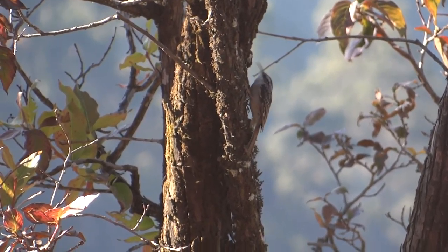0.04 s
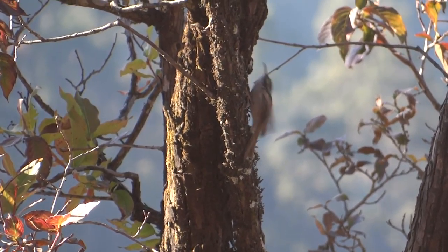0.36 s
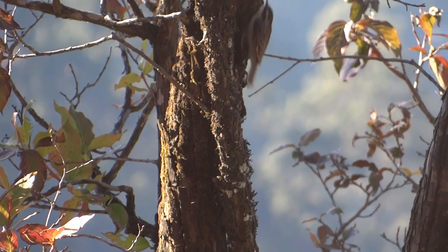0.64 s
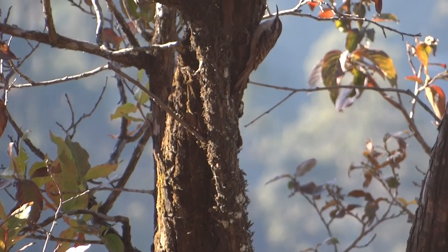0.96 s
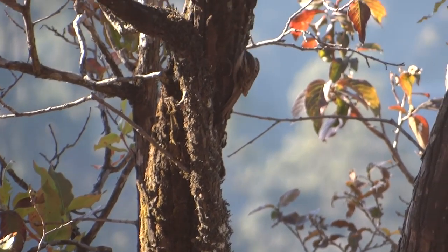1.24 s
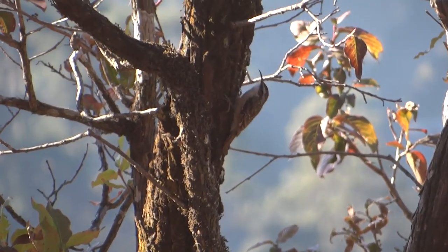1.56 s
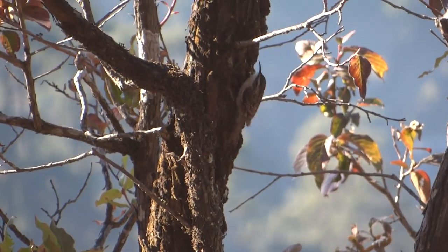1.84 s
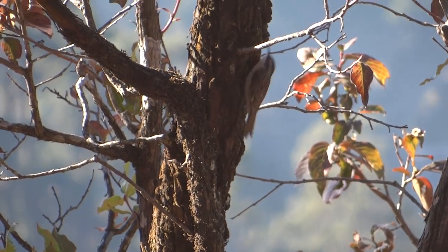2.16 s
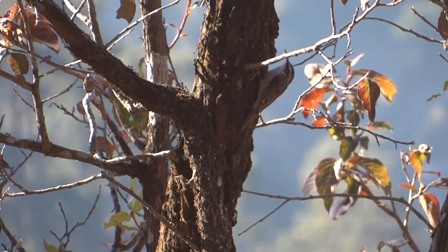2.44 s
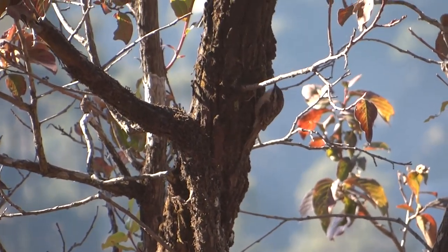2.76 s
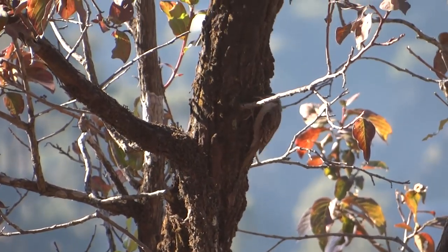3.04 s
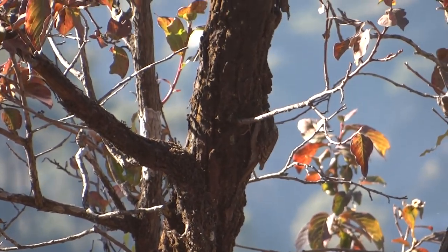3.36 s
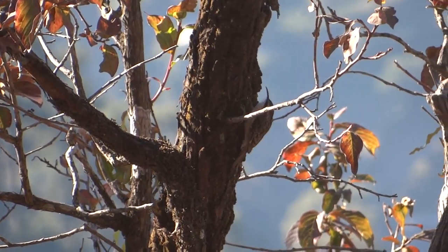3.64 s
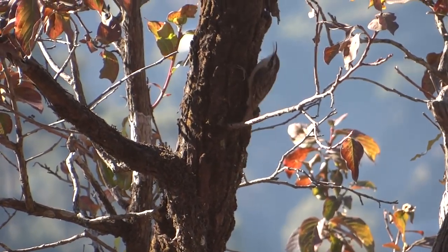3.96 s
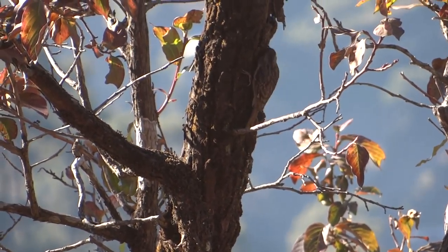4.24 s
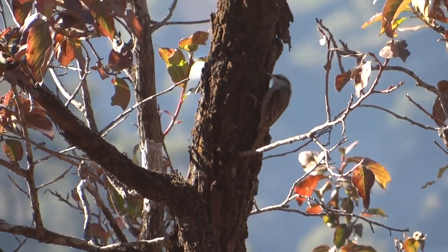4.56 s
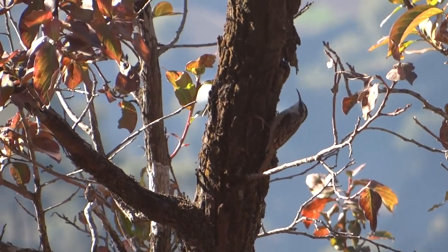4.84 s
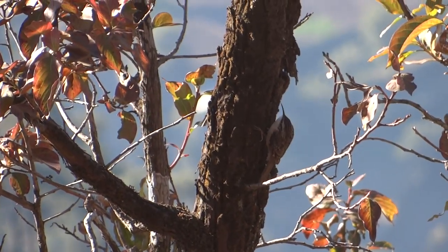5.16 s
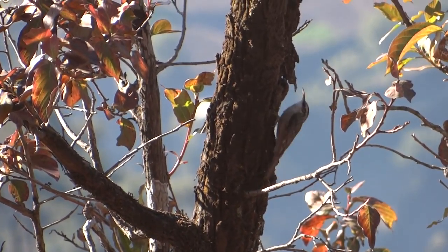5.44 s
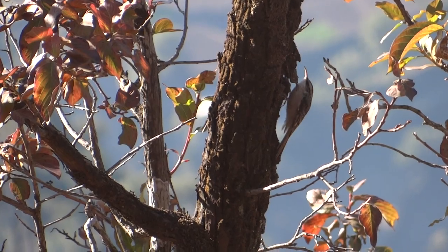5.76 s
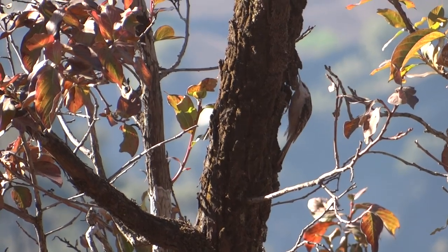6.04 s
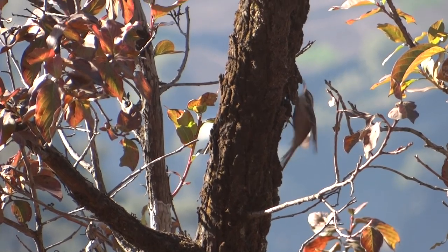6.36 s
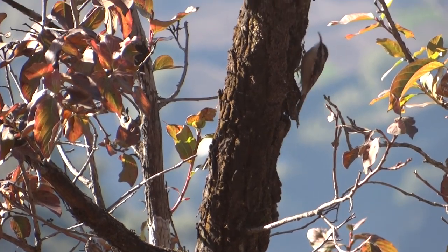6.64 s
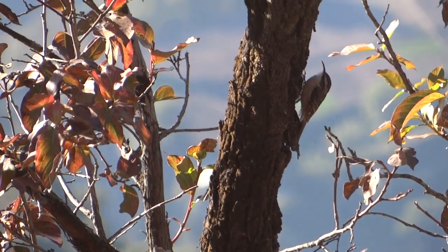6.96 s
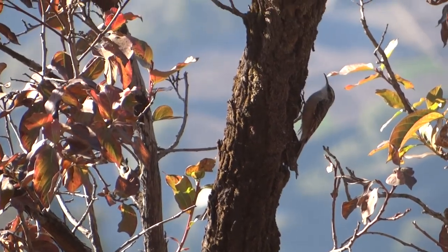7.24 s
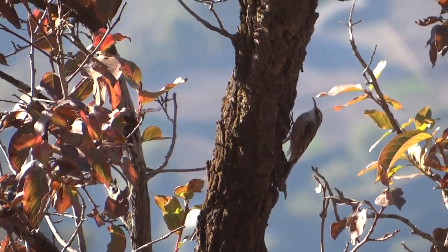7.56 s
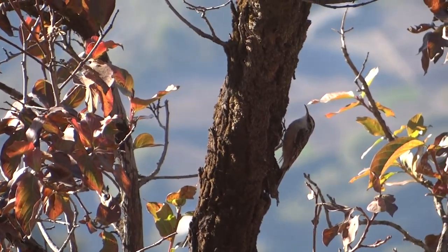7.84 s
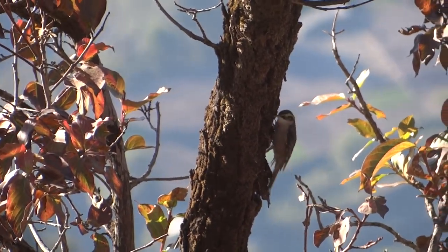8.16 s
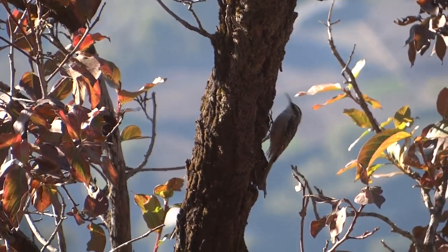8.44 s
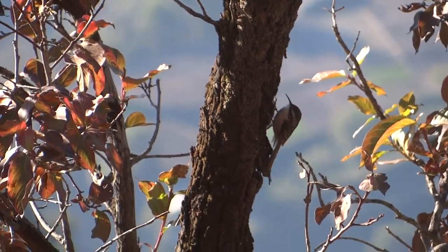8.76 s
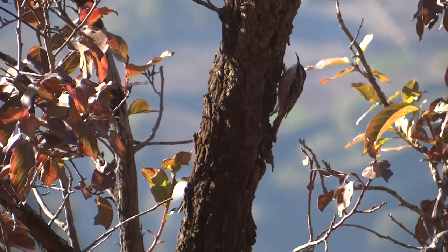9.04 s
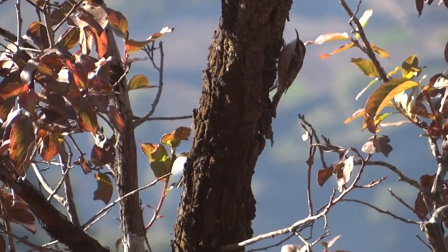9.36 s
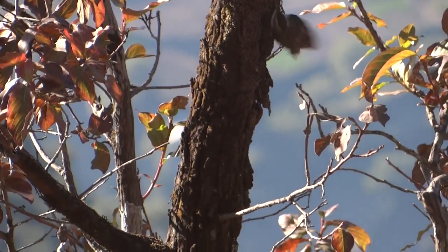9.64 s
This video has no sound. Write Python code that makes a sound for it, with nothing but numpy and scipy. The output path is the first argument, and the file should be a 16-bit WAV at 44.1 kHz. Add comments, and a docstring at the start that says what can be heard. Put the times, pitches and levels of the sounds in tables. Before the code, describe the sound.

On a quiet wooded hillside, wind hits the microphone in low, fluttering puffs that swell and collapse. Now and then the bark ticks faintly under a small climbing bird, and a single damped knock comes just past the middle. Soon afterwards the gusts fade, and what remains is the steady hush of the valley, faint distant drones, microphone hiss and a slight crackle of dry leaves.

```python
"""Gusts buffet the microphone with a low rumble and die away after seven seconds.
Behind them: the wide hush of a wooded valley, faint far drones and the microphone's own hiss.
Bark ticks faintly as a small bird climbs a trunk, and dry leaves rustle.
One dry, heavily damped knock sounds at six seconds."""
import sys
import numpy as np
from scipy import signal
from scipy.fft import rfft, irfft, next_fast_len
from scipy.io import wavfile
from scipy.ndimage import uniform_filter1d

SR = 44100
rng = np.random.default_rng(int(sys.argv[2]) if len(sys.argv) > 2 else 0)


def materialize(psi):
    """Save the field psi as 16-bit PCM at rate SR to the path in sys.argv[1].

    A 1-D psi becomes a single channel; in a 2-D psi each row is a channel.
    """
    bounded = np.clip(np.atleast_2d(psi).T, -1, 1)
    quanta = np.round(bounded * 32767).astype(np.int16)
    wavfile.write(sys.argv[1], SR, quanta)


N = 436590


def gain_of(db):
    """Decibels to amplitude."""
    return 10 ** (np.asarray(db) / 20)


def unit_rms(x):
    """Scales to rms 1."""
    return x / np.sqrt(np.mean(x ** 2) + 1e-20)


def coloured(x, spectrum):
    """Filters x by rows of (Hz, dB), interpolated over log frequency."""
    size = next_fast_len(x.shape[-1])
    hz, db = np.transpose(spectrum)
    bin_db = np.interp(np.log(np.fft.rfftfreq(size, 1 / SR) + 1), np.log(hz + 1), db)
    return irfft(rfft(x, size) * gain_of(bin_db), size)[..., :x.shape[-1]]


def stereo_noise(side_spectrum):
    """Left and right from a white mid and a filtered side."""
    mid, side = rng.standard_normal((2, N))
    side = coloured(side, side_spectrum)
    return np.array([mid + side, mid - side])


def add(mix, start_s, sound):
    """Mixes a sound in from start_s."""
    part = mix[..., max(round(start_s * SR), 0):][..., :sound.shape[-1]]
    part += sound[..., :part.shape[-1]]


def airflow(attack_s=0.022, release_s=0.029, flutter_db=2, flutter_per_s=30):
    """Level and fineness of the flow in dB: gusts swell, hold and collapse over light air."""
    # Each row: time in seconds, level between gusts in dB.
    light_air = [(0, -58), (.3, -47), (.9, -52), (1.4, -51), (2.13, -54), (2.8, -48), (3.6, -43.5),
                 (3.9, -62.5), (4.4, -52.5), (5.4, -52.5), (5.65, -52), (7.05, -58), (7.6, -53.5),
                 (8.1, -66.5), (8.8, -67.5), (9.15, -61.5), (9.9, -59)]
    # Each row: start in seconds, length in seconds, level in dB, fineness in dB (higher is brighter).
    gusts = [(0.057, 0.042, -47, -10), (0.203, 0.11, -40, 3), (0.373, .12, -40, 10.5),
             (0.558, 0.065, -39.5, 6), (0.664, .21, -39, 16), (0.919, .06, -41, 10),
             (1.01, 0.091, -39.5, -3), (1.159, 0.079, -40, 6), (1.266, 0.12, -44.5, 15),
             (1.5, 0.18, -45, 5.5), (1.721, 0.15, -44.5, 13), (1.928, 0.064, -43.5, 4),
             (2.224, 0.11, -51, -4), (2.5, 0.15, -42, 7), (2.63, 0.12, -33.5, 6), (2.751, .22, -36.5, 5.5),
             (2.996, 0.056, -43.5, 4), (3.16, 0.18, -48, -1), (3.377, .13, -35, 5),
             (3.558, 0.13, -39.5, -1), (4.07, 0.17, -46.5, -2), (4.249, 0.184, -43, 5.5),
             (4.546, 0.14, -43, 4), (4.66, .21, -39.5, 4.5), (4.88, .18, -41.5, 0), (5.078, 0.11, -42.5, 7),
             (5.226, 0.086, -50, 0), (5.38, 0.066, -46.5, 13), (5.949, .1, -46, -8), (6.45, 0.065, -47, 3),
             (6.526, 0.18, -43, -3), (7.16, 0.041, -51, -3), (7.347, 0.083, -47, -2),
             (9.463, .06, -55.5, -4)]
    t = np.arange(N) / SR
    power = gain_of(np.interp(t, *np.transpose(light_air))) ** 2
    weighted_fineness = np.zeros(N)
    for start_s, length_s, db, fine_db in gusts:
        ramp = np.minimum((t - start_s) / attack_s, (start_s + length_s - t) / release_s)
        gust_power = (gain_of(db) * np.clip(0.5 + ramp, 0, 1)) ** 2
        power += gust_power
        weighted_fineness += fine_db * gust_power
    flutter = np.interp(t * flutter_per_s, np.arange(1024), rng.standard_normal(1024))
    return 10 * np.log10(power) + flutter_db * flutter, weighted_fineness / power


def wind(trim_db=-2.25, breeze_db=-40.5, strong_db=-26.5, steady_s=0.058, lull=0.12):
    """Turbulence at the microphone: a stronger gust sheds smaller eddies and sounds brighter."""
    # Each row: frequency in Hz, relative density in dB.
    breeze_spectrum = [(12, -18), (32, -4.5), (55, 3), (90, -4), (125, -11), (180, -22), (250, -31.5),
                       (400, -45), (1000, -64.5), (3000, -100)]
    gust_spectrum = [(12, -32), (32, -12), (55, 3), (100, -1), (140, -3), (200, -16), (270, -26.5),
                     (450, -41.5), (1000, -56), (3000, -97)]
    # Each row: frequency in Hz, side over mid in dB.
    side_spectrum = [(30, -20), (60, -13.5), (110, -8.5), (170, -2.5), (260, -2), (500, 4)]
    flow_db, fine_db = airflow()
    force = np.clip((flow_db + fine_db - breeze_db) / (strong_db - breeze_db), 0, 1)
    air = stereo_noise(side_spectrum)
    rumble = (1 - force) * unit_rms(coloured(air, breeze_spectrum))
    rumble += force * unit_rms(coloured(air, gust_spectrum))
    # Level the noise so that the flow sets the slow swell.
    span = int(steady_s * SR)
    power = uniform_filter1d(uniform_filter1d(rumble.mean(0) ** 2, span), span)
    # Below the mean flow, turbulence collapses into separate puffs.
    slack_db = np.minimum(flow_db - uniform_filter1d(flow_db, SR // 4), 0)
    return gain_of(flow_db + lull * slack_db + trim_db) * rumble / np.sqrt(power + 1e-9)


def valley(level_db=-66.5):
    """Far air in the trees, steady and from all sides."""
    # Each row: frequency in Hz, relative density in dB.
    spectrum = [(30, -15), (90, 3), (170, 2.5), (300, 0.5), (440, -1), (620, -2.5), (800, -4.5),
                (1020, -6.5), (1400, -8.5), (2400, -13.5), (5000, -20.5), (9000, -27.5), (15000, -47)]
    # Each row: frequency in Hz, side over mid in dB.
    side_spectrum = [(60, -9.5), (200, -3.5), (400, 0), (700, 1.5), (1100, 2), (2000, 1), (4000, -1.5)]
    hush = coloured(stereo_noise(side_spectrum), spectrum)
    return gain_of(level_db) * hush / np.std(hush.mean(0))


def drones(growth_db=3):
    """Narrow bands of far-off noise that waver and slowly grow."""
    # Each row: centre in Hz, width in Hz, mid-scene rms in dB.
    bands = [(443, 93, -78), (763, 70, -81), (1166, 94, -82), (1697, 56, -88)]
    hz = np.fft.rfftfreq(N, 1 / SR)
    shape = sum(gain_of(db) * unit_rms(1 / (1 + (2 * (hz - centre_hz) / width_hz) ** 4))
                for centre_hz, width_hz, db in bands)
    noise = irfft(rfft(rng.standard_normal((2, N))) * shape, N)
    return noise * gain_of(growth_db * np.linspace(-0.5, 0.5, N))


def hiss(rms_db=-73):
    """Steady microphone self-noise, alike in both channels."""
    # Each row: frequency in Hz, relative density in dB.
    spectrum = [(100, 2), (1000, -7.5), (2600, -2), (5000, -1), (9500, -2), (13000, -4.5), (15500, -7.5)]
    return gain_of(rms_db) * unit_rms(coloured(rng.standard_normal(N), spectrum))


def rustle(crackles_per_s=150, spread_db=3, decay_s=0.0016):
    """Dry leaves and bark crackle in tiny noise bursts of uneven size."""
    # Each row: time in seconds, rms in dB.
    levels = [(0, -97), (5.8, -89), (7.4, -83), (7.8, -80), (9, -85.5), (9.5, -81), (9.9, -81)]
    # Each row: frequency in Hz, relative density in dB.
    spectrum = [(800, -20), (2500, 3), (5000, -2), (8500, -3), (11000, -9), (15000, -17)]
    sizes = gain_of(spread_db * np.minimum(rng.exponential(1, N), 3.5))
    onsets = rng.random(N) < crackles_per_s / SR
    decay = np.exp(-np.arange(SR // 50) / (decay_s * SR))
    bursts = signal.oaconvolve(sizes * onsets, decay)[:N]
    crackle = unit_rms(coloured(bursts * rng.standard_normal(N), spectrum))
    return crackle * gain_of(np.interp(np.arange(N) / SR, *np.transpose(levels)))


def eddies(trim_db=-1, lean=0.25, half_width_cycles=0.67):
    """Single eddies hit the microphone: short pressure swings, a little stronger at one port."""
    # Each row: centre time in seconds, level in dB, frequency in Hz.
    hits = [(0.446, -38.5, 189), (0.672, -34, 109), (.828, -34.5, 161), (0.953, -37, 85.4),
            (1.039, -41, 173), (1.21, -35, 79), (1.313, -42.5, 175), (1.569, -36, 100), (2.679, -45.5, 418),
            (2.683, -32, 190), (2.727, -45, 330), (2.926, -36, 110), (3.452, -31.5, 135), (4.095, -37, 68),
            (4.342, -33, 107), (4.716, -40.5, 190), (5.113, -42, 152), (5.574, -38, 62.5),
            (6.341, -33, 68.6), (6.574, -33.5, 62), (6.604, -33.5, 70), (8.327, -47, 70)]
    out = np.zeros((2, N))
    for (centre_s, db, hz), side in zip(hits, rng.uniform(-1.3, 1, len(hits))):
        half_width_s = half_width_cycles / hz
        t = np.arange(-6 * half_width_s, 6 * half_width_s, 1 / SR)
        swing = -np.cos(2 * np.pi * hz * t) / np.cosh(t / half_width_s) ** 2
        balance = 1 + lean * side * np.array([[1], [-1]])
        add(out, centre_s + t[0], gain_of(db + trim_db) * swing * balance)
    return out


def bark_ticks():
    """A snapping flake pings; a scraping claw gives a noise burst around the same pitch."""
    # Each row: centre time in seconds, level in dB, pitch in Hz, half-width in seconds, noise share 0-1.
    ticks = [(0.59, -66, 8000, .005, 1), (2.055, -59, 7800, .002, 0.6), (4.42, -67, 8500, .004, 1),
             (4.487, -61, 7100, .002, .8), (6.771, -65, 9300, 0.0058, .9), (6.775, -56, 9400, 0.00045, 0.4),
             (6.7763, -52.5, 9400, 0.00074, 0.1), (6.78, -52, 9300, .0003, 0.2),
             (6.813, -64, 8800, .001, .9), (7.672, -63, 8000, .002, .9), (7.82, -63, 7500, .007, 0.8),
             (7.981, -61, 6500, 0.0033, 1), (9.18, -59.5, 8500, 0.0037, 0.73),
             (9.876, -65, 8600, .002, 0.7)]
    out = np.zeros(N)
    t = np.arange(-1024, 1024) / SR
    for centre_s, db, hz, half_width_s, share in ticks:
        band = [(hz / 4, -20), (hz / 2, -6), (hz, 0), (hz * 1.4, -4), (hz * 2, -20)]
        scratch = unit_rms(coloured(rng.standard_normal(len(t)), band))
        tick = (1 - share) * np.sin(2 * np.pi * hz * t) + share * scratch / 2
        add(out, centre_s + t[0], gain_of(db) * tick * np.exp(-(t / half_width_s) ** 2))
    return out


def knock(start_s=6.0505, level_db=-37.5, bend=0.32, settle_s=0.00084, rise_s=0.0004):
    """A dry, heavily damped knock whose pitch sags as the contact relaxes."""
    # Each row: settled frequency in Hz, relative level in dB, T60 in seconds.
    modes = [(1355, 0, 0.012), (3240, -17.5, 0.011), (6200, -14, .005), (8600, -15, .003)]
    t = np.arange(SR // 20) / SR
    bent_t = t + bend * settle_s * (1 - np.exp(-t / settle_s))
    ring = sum(gain_of(db) * np.exp(-np.log(1000) * t / t60_s) * np.sin(2 * np.pi * hz * bent_t)
               for hz, db, t60_s in modes)
    out = np.zeros(N)
    add(out, start_s, gain_of(level_db) * ring * (1 - np.exp(-t / rise_s)))
    return out


def woodland(x, t60_s, wet_db):
    """Trunks and leaves scatter a short, thin stereo tail."""
    t = np.arange(SR // 3) / SR
    tail = rng.standard_normal((2, len(t))) * np.exp(-np.log(1000) * t / t60_s)
    tail /= np.linalg.norm(tail[0])
    return x + gain_of(wet_db) * signal.fftconvolve(x[None], tail, axes=1)[:, :N]


def scene():
    """Wind and small woodland sounds over the quiet background."""
    background = valley() + drones() + hiss()
    knocked = woodland(knock(), t60_s=0.11, wet_db=-15)
    bark_and_leaves = woodland(bark_ticks() + rustle(), t60_s=0.2, wet_db=-8.5)
    return wind() + eddies() + background + knocked + bark_and_leaves


def record(dry, cutoff_hz=15700):
    """The camera's band limit: a steep low-pass."""
    taps = signal.firwin(1023, cutoff_hz, window=("kaiser", 9), fs=SR)
    return signal.oaconvolve(dry, taps[None], "same")


dry = scene()
out = record(dry)
materialize(out)
```